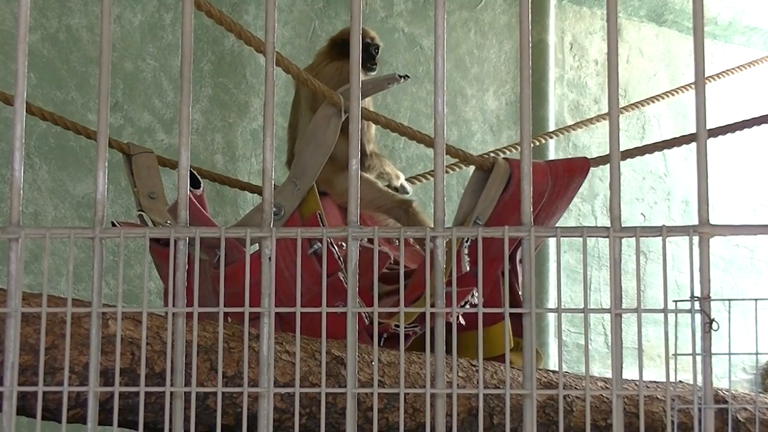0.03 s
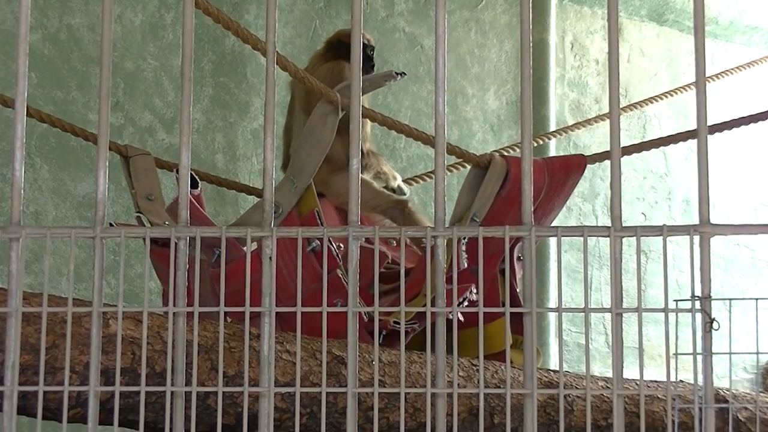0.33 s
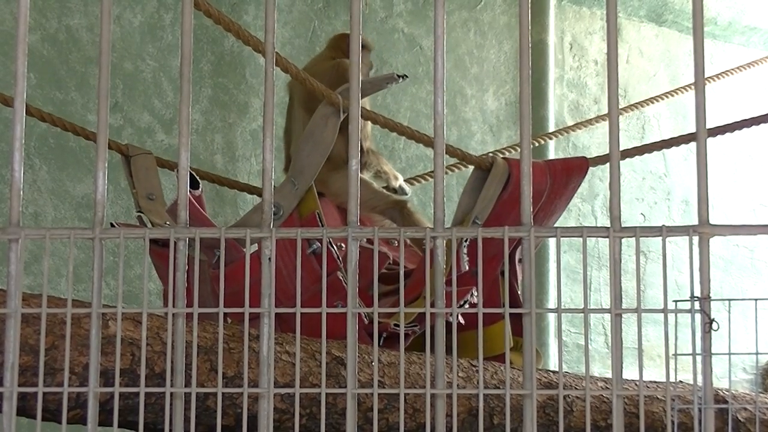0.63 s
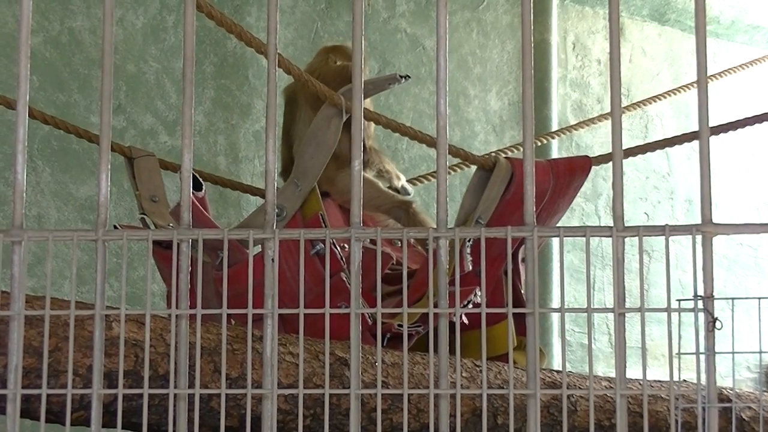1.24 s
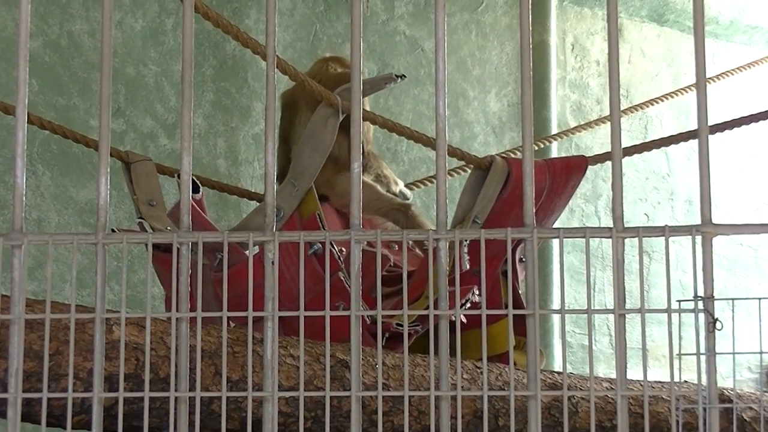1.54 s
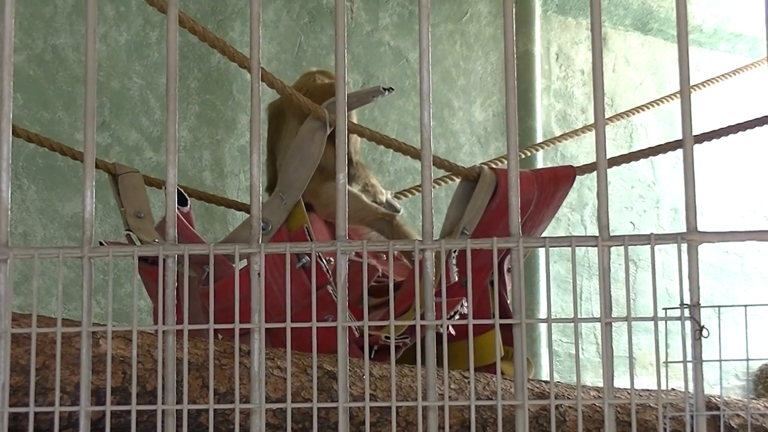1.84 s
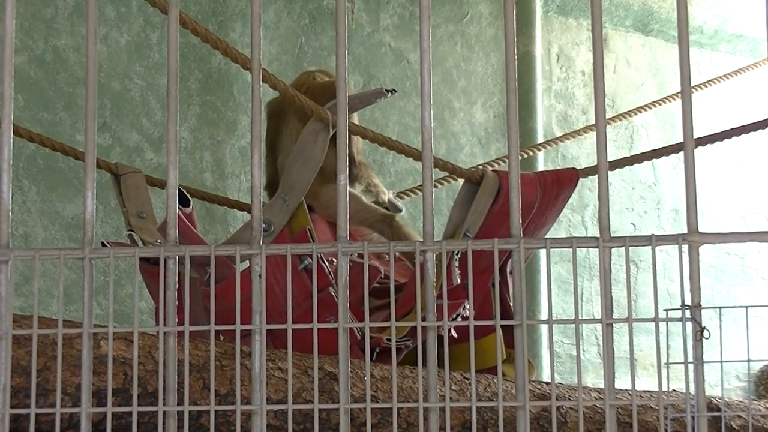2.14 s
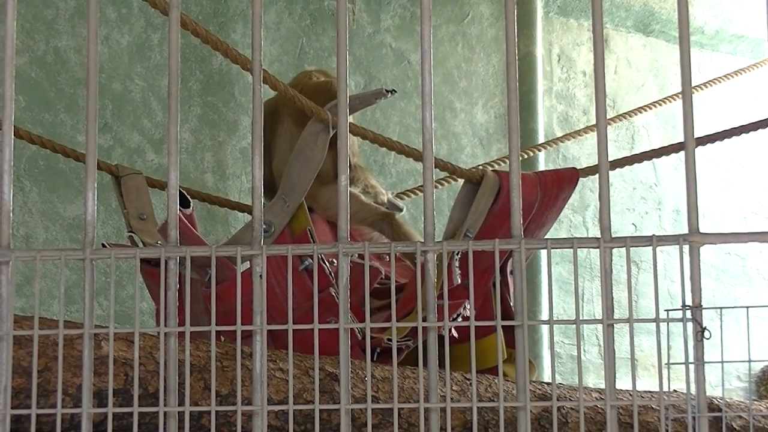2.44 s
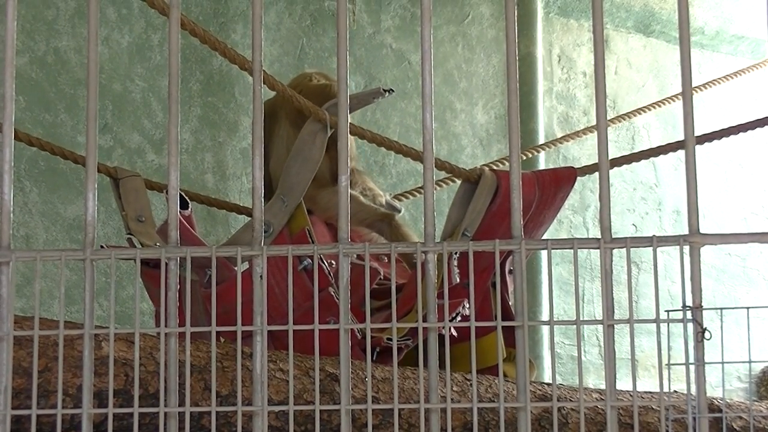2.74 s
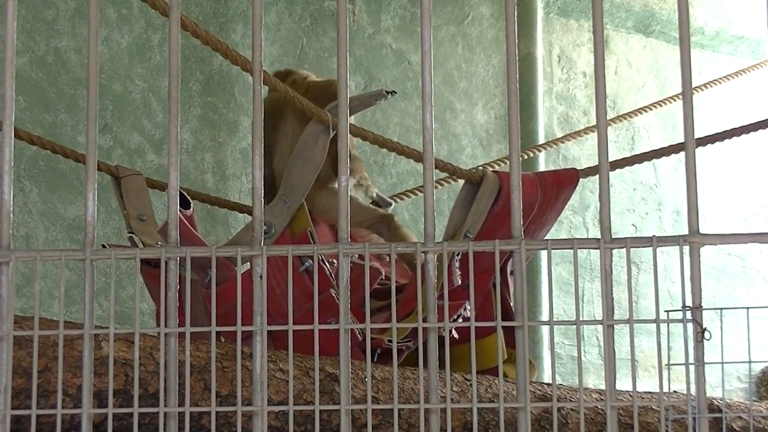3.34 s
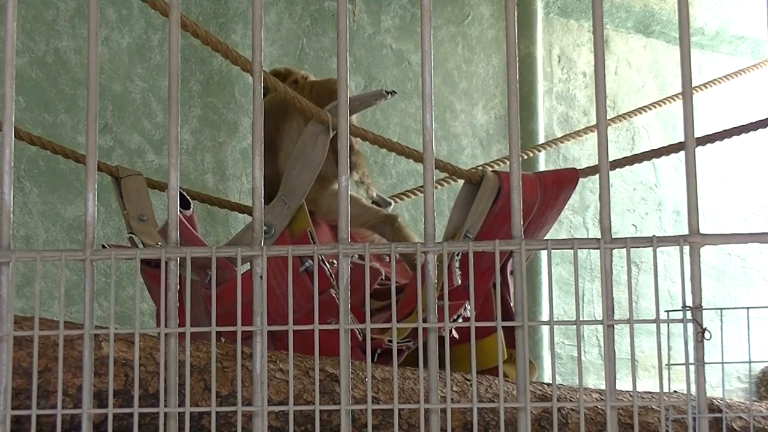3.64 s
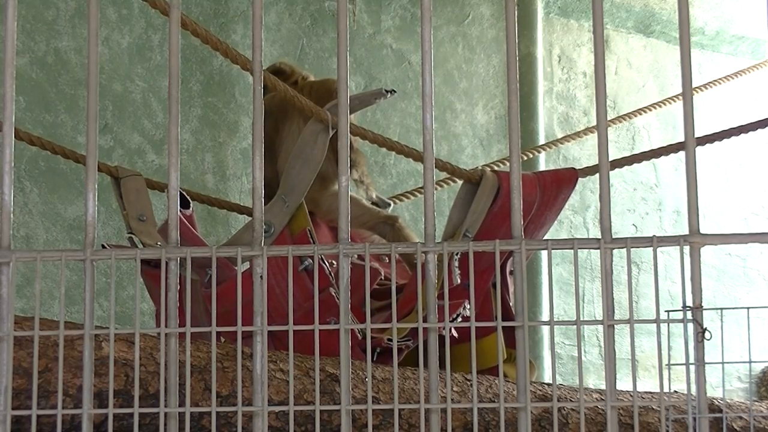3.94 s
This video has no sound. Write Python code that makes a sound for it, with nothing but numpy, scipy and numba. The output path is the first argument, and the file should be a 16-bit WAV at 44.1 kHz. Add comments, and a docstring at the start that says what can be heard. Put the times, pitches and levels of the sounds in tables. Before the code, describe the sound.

Gibbons call loudly in a bare, echoing hall. From 0.2 to 2.3 seconds, long, nearly pure notes overlap and glide upward, crackling slightly in the first second. Four short rising whoops follow at about 2.7, 3.2, 3.5 and 3.8 seconds, each ringing on. Faint dull rumbles swell at the start and near 2.5 seconds, with soft scuffs around 2.5 and 3.1, over steady low ventilation.

```python
"""Gibbons whoop in a bare, very live zoo hall: long, overlapping glides, then four short upward whoops.
Each voice is a near-pure tone with weak, fluttering overtones and breath, coloured by the throat.
The walls hold every pitch for seconds. Now and then something scuffs, and two dull rumbles swell over
the ventilation. Automatic gain control ducks the background under the calls; the loudest peaks crackle."""
import sys
import numpy as np
from scipy import signal
from scipy.fft import rfft, irfft
from scipy.io import wavfile
from scipy.ndimage import uniform_filter1d, minimum_filter1d
from numba import njit

SR = 44100
rng = np.random.default_rng(int(sys.argv[2]) if len(sys.argv) > 2 else 0)


def store_wav(level_fs):
    """Save 16-bit WAV to argv[1]."""
    pcm = np.round(np.clip(np.atleast_2d(level_fs), -1, 1) * 32767)
    wavfile.write(sys.argv[1], SR, pcm.T.astype(np.int16))


N = 176400
LEAD = SR // 2  # samples of pre-roll: the hall is already ringing at the start
TOP_HZ = 15800


def long_calls():
    """Gibbons sing long, overlapping notes that glide smoothly in pitch, level and brightness."""
    # One list per note. Each row: time in seconds, pitch in Hz, relative level in dB, overtone lift in dB.
    notes = [
        [(.18, 584.5, -14.5, -8.5), (.22, 622.3, 6.5, 3.5), (.25, 718, 9.5, -17.5), (.28, 876, 8.5, 3),
         (.32, 990, -1.5, 14), (.44, 1065, 12.5, 9.5), (.55, 1099, -8, 31.5), (.66, 1067, 11.5, 10.5),
         (.73, 968.5, 3.5, 25), (.8, 822.4, 8.5, 1)],
        [(.32, 604, -3, 0.5), (.37, 656.4, 0, -13), (.43, 850.3, 1, -16.5), (.47, 1121, 16.5, 1.5),
         (.5, 1192, 1, 28.5), (.59, 1219, 3.5, 11)],
        [(.81, 625.3, 3, -14.5), (.86, 631, 9.5, -6.5), (.9, 758.3, 9.5, 2), (.94, 897.3, 9.5, 2),
         (.97, 863.8, 3.5, 0.5), (1., 831.1, 19, -2.5), (1.12, 826, 0.5, 8.5), (1.29, 825.5, 2.5, 1.5),
         (1.34, 841, -8.5, -0.5)],
        [(1.18, 588.8, -17.5, -10), (1.27, 592.2, 4, -17), (1.31, 654, 9, 1), (1.34, 749.3, 8.5, -5.5),
         (1.42, 712.5, -0.5, 2), (1.52, 708.3, 6.5, -7), (1.63, 731.8, -0.5, -5.5)],
        [(1.615, 522.5, -7, -9.5), (1.655, 531.9, 6, -10), (1.685, 536, -1.5, 6.5), (1.72, 622.5, 10.5, -6),
         (1.75, 741.7, 1, -6.5), (1.8, 780, 12, 3)],
        [(1.82, 545, 1.5, -3), (1.87, 589.8, 0.5, -4.5), (1.92, 692.8, 8, -7), (1.96, 796, -4.5, -14.5),
         (2., 765.8, 13.5, -9.5), (2.04, 701.4, 5.5, -2.5), (2.13, 708, 8, -16), (2.18, 757, 8, -14.5)],
        [(2.13, 785.6, 7.5, -4.5), (2.16, 808.4, 9.5, 3), (2.19, 875.6, 2.5, 13), (2.25, 908.4, -3, 10)],
    ]
    # Throat resonances. Each row: frequency in Hz, relative gain in dB.
    throat = [(1000, -29), (1350, -21), (1700, -20.5), (2100, -23.5), (2450, -33.5), (2750, -38.5),
              (3150, -38), (3500, -44.5), (3950, -25.5), (4250, -33), (4650, -46), (5200, -37.5),
              (6200, -46.5), (6800, -36), (7500, -48), (8400, -45), (9300, -66.5), (15000, -86)]
    out = np.zeros(LEAD + N)
    for note in notes:
        times, *controls = np.array(note, float).T
        t = np.arange(times[0], times[-1], 1 / SR)
        hz, db, overtones_db = (uniform_filter1d(np.interp(t, times, c), size=600) for c in controls)
        add(out, times[0], voice(t, hz, db, overtones_db, throat))
    return out


def short_whoops():
    """Each whoop holds its pitch as it swells, then sweeps up; the first is heard only as hall ring."""
    # Each row: start and length in seconds, first and last pitch in Hz, then relative level,
    # depth of the swell and overtone lift in dB.
    whoops = [(-.28, .17, 520, 786.6, 7, 7.5, -9), (2.669, .115, 490.2, 682.4, 2, 34, -9),
              (3.163, 0.092, 491, 708.4, 2, 17.5, -5.5), (3.457, .115, 526.8, 835, 11, 15, -9),
              (3.818, 0.12, 521.2, 773, 2, 6.5, -4.5)]
    # Throat resonances. Each row: frequency in Hz, relative gain in dB.
    throat = [(1000, -22), (1350, -17.5), (1750, -5), (2050, -29.5), (2600, -50.5), (3500, -45),
              (4300, -25.5), (4750, -41.5), (5400, -33.5), (6300, -43), (7100, -44.5), (8600, -43.5),
              (10000, -56.5), (11500, -77.5)]
    bend_power, swell_share = 2.8, 0.48
    out = np.zeros(LEAD + N)
    for start, length, first_hz, last_hz, db, swell_db, overtones_db in whoops:
        t = np.arange(0, length, 1 / SR)
        progress = t / length
        hz = first_hz + (last_hz - first_hz) * progress ** bend_power
        soft_db = swell_db * np.clip(1 - (progress / swell_share) ** 2, 0, 1)
        add(out, start, voice(t, hz, db - soft_db, overtones_db, throat))
    return out


def voice(t, hz, db, overtones_db, throat):
    """One gibbon note: a strong fundamental, with overtones and breath shaped by the throat."""
    attack_s, release_s = 0.004, 0.014
    jitter_depth, flutter_depth, flicker_db = 0.002, 0.007, 4
    voice_db, overtone_floor_db, upper_share = -9.5, -9.5, 0.61
    hz = hz * (1 + jitter_depth * drift(90, len(t)))
    phase = 2 * np.pi * np.cumsum(hz) / SR
    flutter = 2 * np.pi * np.cumsum(hz * flutter_depth * drift(400, len(t))) / SR
    harmonic = np.arange(2, 20)[:, None]
    weights = undb(lookup(harmonic * hz, throat)) * (harmonic * hz < TOP_HZ)
    second, *higher = weights * np.sin(harmonic * (phase + flutter))
    upper = sum(partial * undb(flicker_db * (drift(30, len(t)) - 1.5)) for partial in higher)
    upper += breath(hz, phase, throat)
    overtones = undb(overtones_db) * second + undb(upper_share * overtones_db) * upper
    # A soft start keeps its overtones while the fundamental is still weak.
    tone = undb(db) * np.sin(phase) + undb(np.maximum(db, overtone_floor_db)) * overtones
    gate = np.clip((t - t[0]) / attack_s, 0, 1) * np.clip((t[-1] - t) / release_s, 0, 1)
    return np.sin(np.pi / 2 * gate) ** 2 * undb(voice_db) * tone


def breath(hz, phase, throat):
    """Air rasps through the throat, pulsing with each cycle of the voice."""
    rasp_db, low_cut_hz, pulse_depth = -14.5, 700, 0.38
    freqs = np.fft.rfftfreq(len(hz), 1 / SR)
    colour = undb(lookup(freqs, throat)) * np.minimum(freqs / low_cut_hz, 1) ** 2
    air = irfft(rfft(rng.standard_normal(len(hz))) * colour, len(hz))
    return air * undb(rasp_db) * np.sqrt(SR / hz) / 2 * (1 + pulse_depth * np.sin(phase))


def hall_response():
    """Bare walls return a few echoes and a diffuse tail, wider in the treble, which dies first."""
    # Ring of the hall. Each row: frequency in Hz, seconds to fall by 60 dB.
    ring_times = [(125, 3.5), (500, 2.43), (900, 2.344), (2000, 1.32), (4000, 1.38), (8000, 0.31),
                  (16000, .25)]
    # Stereo spread. Each row: frequency in Hz, extra side level in dB.
    width = [(600, -0.5), (1100, -0.5), (2200, 6), (4500, 6), (8000, 11)]
    # Wall echoes. Each row: delay in seconds, level in dB.
    echoes = [(.012, -9), (.034, -6.5), (.135, -22)]
    tail_db, side_db, build_s = 3, -23, 0.005
    freqs, t, spectra = signal.stft(rng.standard_normal((2, 2 * SR)), SR, nperseg=512)
    fade = np.exp(-np.log(1000) * t / lookup(freqs, ring_times)[:, None]) * (1 - np.exp(-t / build_s))
    spectra[1] *= undb(lookup(freqs, width))[:, None]
    mid, side = signal.istft(spectra * fade, SR)[1] * undb(tail_db) * np.sqrt(np.log(1000) / SR)
    for delay, db in echoes:
        mid[int(delay * SR)] += undb(db)
    return mid + undb(side_db) * side * np.array([[1], [-1]])


def crackle():
    """Tiny dry ticks, placed on the loudest part of the calls."""
    # Each row: start in seconds, level in dB.
    ticks = [(.315, -25), (.350, -29), (.377, -22), (.551, -10.5), (.617, -19), (.702, -24), (.738, -26),
             (1.108, -22), (1.115, -22)]
    # Bright tick spectrum. Each row: frequency in Hz, relative level in dB.
    colour = [(1000, -0.5), (3000, 10), (6000, 2), (10000, -12), (16000, -23)]
    decay_s = 0.0013
    out, t = np.zeros(LEAD + N), np.arange(SR // 50) / SR
    for start, db in ticks:
        add(out, start, undb(db) * noise(colour, len(t)) * np.exp(-t / decay_s))
    return out


def scuffs():
    """Something scuffs and rustles faintly."""
    # Each row: start, rise and decay in seconds, level in dB.
    strokes = [(.215, 0.013, 0.028, -42), (2.35, .22, 0.093, -47), (3.077, 0.0041, 0.02, -38),
               (3.094, 0.0044, 0.021, -36.5), (3.118, .003, 0.09, -41.5)]
    # Scratchy spectrum. Each row: frequency in Hz, relative level in dB.
    colour = [(200, -5.5), (1200, 6), (2700, 8.5), (5000, -0.5), (9000, -15.5), (15000, -38.5)]
    return noise_swells(strokes, colour)


def rumbles():
    """Dull, low rumbles well up and fade."""
    # Each row: start, rise and decay in seconds, level in dB.
    swells = [(-.1, .15, 0.23, -39), (2.33, .25, 0.24, -38.5)]
    # Bass-heavy spectrum. Each row: frequency in Hz, relative level in dB.
    colour = [(40, -44), (85, -4.5), (150, 5.5), (300, -2), (500, -4), (1000, -36.5), (4000, -69.5)]
    return noise_swells(swells, colour)


def ventilation():
    """A gently wavering bed of moving air with a faint mains hum."""
    # Airflow spectrum. Each row: frequency in Hz, relative level in dB.
    colour = [(25, -33.5), (55, -34.5), (80, -16.5), (125, -7.5), (180, -0.5), (280, 1), (420, -0.5),
              (800, -10.5), (1500, -7.5), (3000, -24), (6000, -32.5), (10000, -43.5), (16000, -57)]
    # Hum tones. Each row: frequency in Hz, level in dB.
    tones = [(62, -59), (129, -51.5)]
    air_db, side_db, waver_db = -36.5, -21, 1.2
    t = np.arange(N) / SR
    air = noise(colour, N) + undb(side_db) * noise(colour, N) * np.array([[1], [-1]])
    hum = sum(undb(db) * np.sin(2 * np.pi * hz * t) for hz, db in tones)
    return undb(air_db + waver_db * drift(15, N)) * air + hum


def noise_swells(events, colour):
    """Bursts of coloured noise that rise and die away."""
    out, t = np.zeros(LEAD + N), np.arange(2 * SR) / SR
    for start, rise, decay, db in events:
        envelope = np.minimum(t / rise, 1) * np.exp(-np.maximum(t - rise, 0) / decay)
        add(out, start, undb(db) * noise(colour, len(t)) * envelope)
    return out


def noise(colour, size):
    """Noise of the given colour, rms 1."""
    gains = undb(lookup(np.fft.rfftfreq(size, 1 / SR), colour))
    x = irfft(rfft(rng.standard_normal(size)) * gains, size)
    return x / x.std()


def drift(rate_hz, size):
    """Smooth random drift, spread near 1."""
    step = int(SR / rate_hz)
    return 1.15 * uniform_filter1d(np.repeat(rng.standard_normal(size // step + 1), step), step)[:size]


def undb(db):
    """Decibels to gain."""
    return 10 ** (np.asarray(db) / 20)


def lookup(hz, points):
    """Read (Hz, value) points on a log-frequency axis."""
    freqs, values = np.array(points, float).T
    return np.interp(np.log(np.maximum(hz, 1)), np.log(freqs), values)


def add(track, start, x):
    """Mix a sound into a track at its start time."""
    i = LEAD + int(start * SR)
    track[i:i + len(x)] += x[:len(track) - i]


@njit
def ride_gain(peak, limit, attack, recover):
    """Gain that drops quickly while the output is over the limit and creeps back to 1."""
    out, gain = np.empty(len(peak)), 1.
    for i in range(len(peak)):
        if peak[i] * gain > limit:
            gain += (limit / peak[i] - gain) * attack
        else:
            gain = min(1., gain * recover)
        out[i] = gain
    return out


def scene():
    """Calls and scuffs ring in the hall; rumbles, crackle and ventilation stay dry."""
    shade_hz, shade_db, scuff_send = 2600, -13, 0.22
    hall, air = hall_response(), ventilation()
    calls, scrape = long_calls() + short_whoops(), scuffs()
    # The voices' treble arrives mostly by the walls, so the direct sound is shaded.
    dull = signal.sosfiltfilt(signal.butter(2, shade_hz, fs=SR, output="sos"), calls)
    direct = dull + undb(shade_db) * (calls - dull)
    wet = signal.fftconvolve((calls + scuff_send * scrape)[None], hall, axes=1)[:, :LEAD + N]
    return (direct + scrape + rumbles() + crackle() + wet)[:, LEAD:] + air


def record(dry):
    """Gain control ducks just ahead of the peaks, any overshoot is clipped, and the top treble is cut."""
    limit_db, attack_s, recover_db_per_s, look_ahead_samples = -2.5, 0.0011, 25.5, 150
    peak = np.abs(dry).max(axis=0)
    gain = ride_gain(peak, float(undb(limit_db)), 1 / (attack_s * SR), float(undb(recover_db_per_s / SR)))
    gain = uniform_filter1d(minimum_filter1d(gain, 2 * look_ahead_samples), look_ahead_samples)
    treble_cut = signal.ellip(8, .2, 70, TOP_HZ, fs=SR, output="sos")
    return signal.sosfilt(treble_cut, np.clip(dry * gain, -1, 1))


dry = scene()
out = record(dry)
store_wav(out)
```